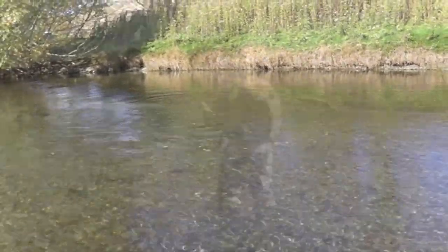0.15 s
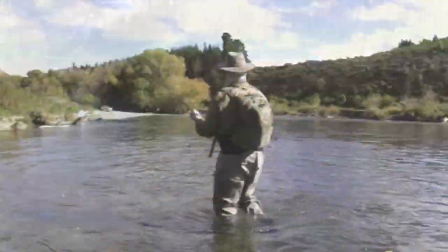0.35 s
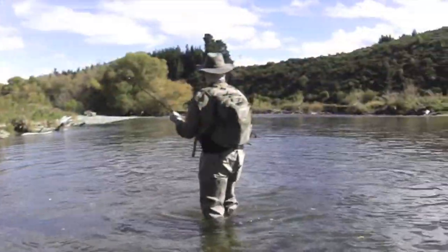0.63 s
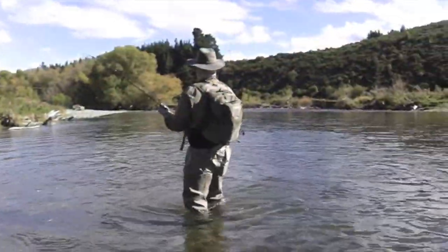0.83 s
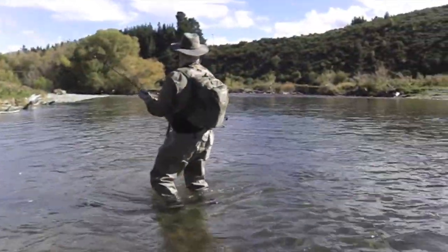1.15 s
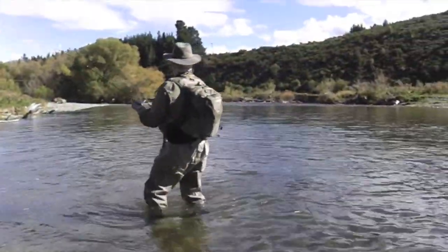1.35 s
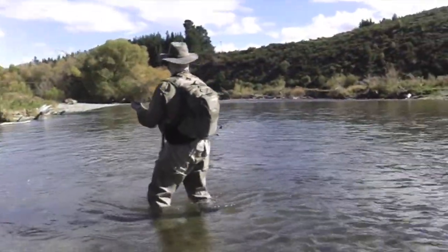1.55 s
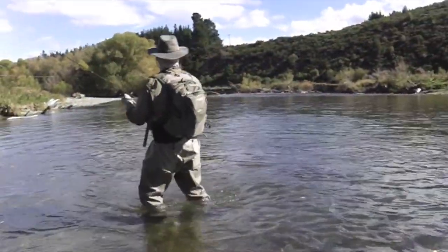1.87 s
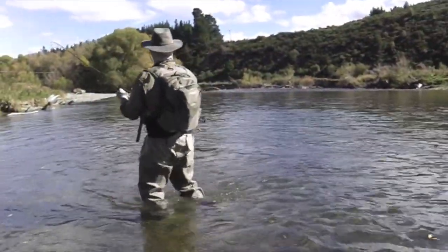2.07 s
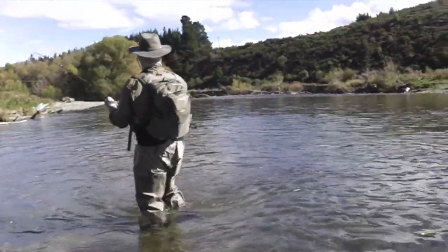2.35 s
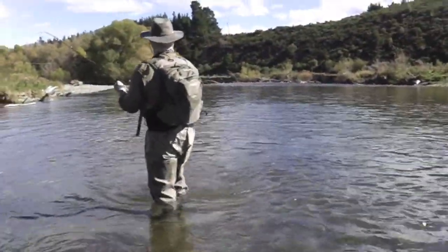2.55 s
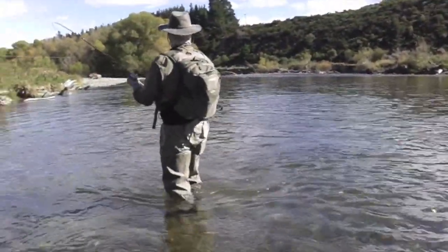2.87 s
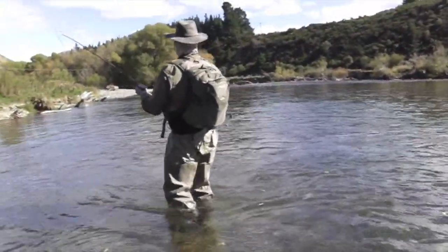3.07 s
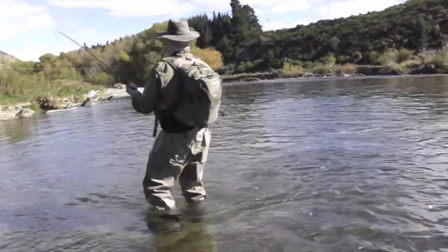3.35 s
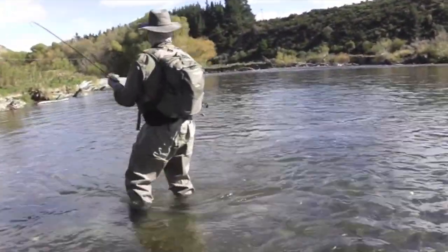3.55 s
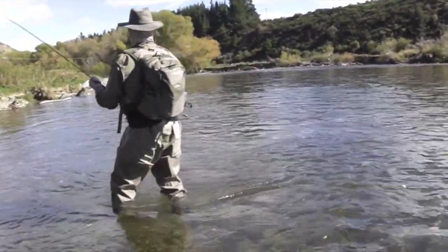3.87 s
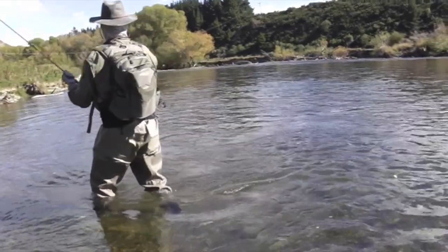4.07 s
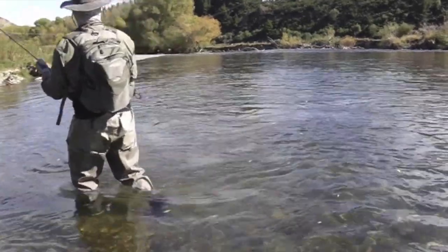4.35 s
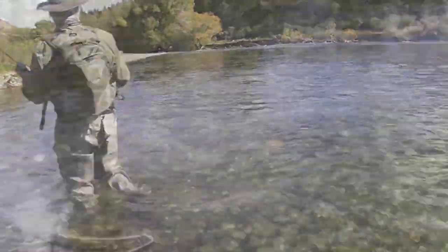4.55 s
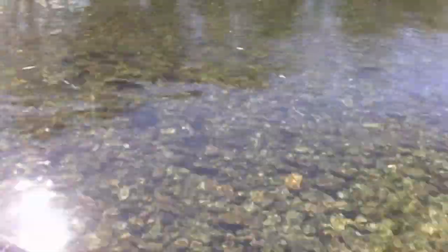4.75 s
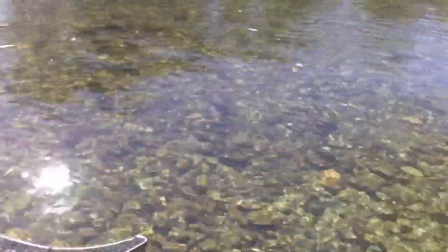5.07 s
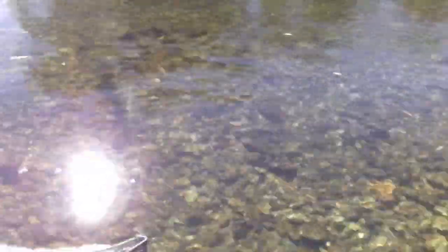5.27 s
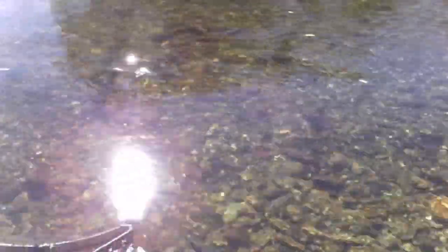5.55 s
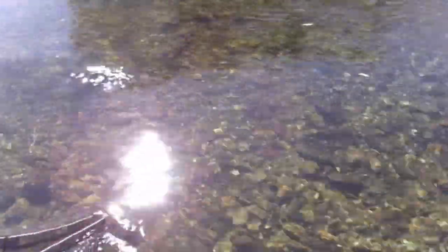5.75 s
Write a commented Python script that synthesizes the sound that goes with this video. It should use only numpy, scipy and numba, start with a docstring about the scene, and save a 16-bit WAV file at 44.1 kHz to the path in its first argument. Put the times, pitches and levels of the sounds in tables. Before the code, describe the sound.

Shallow river water rushes steadily over stones while someone wades, with gurgles, small splashes and drips, ending in loud close sloshing.

```python
"""A riffle rushes over distant stones as bubble-like noise; its tone and level shift within the first 0.6 s.
Faint insects, a narrow band of noise, swell at 0.6 s and fade. An angler wades on: gulps, splashes and swishes
are surges of ringing bubbles and noise, and single drips ring out as damped sines that rise in pitch.
Low, soft puffs of wind brush the two microphone ports from 0.6 s on.
From 5.2 s the stirring is at its strongest and the water sloshes right by the microphone."""
import sys
import numpy as np
from scipy import signal
from scipy.fft import rfft, irfft
from scipy.io import wavfile
from scipy.ndimage import uniform_filter1d
from numba import njit

SR = 44100
rng = np.random.default_rng(int(sys.argv[2]) if len(sys.argv) > 2 else 0)


def dump(signal):
    """Clip the signal to [-1, 1] and save it as 16-bit WAV at the path in sys.argv[1]."""
    limited = np.clip(np.atleast_2d(signal).T, -1, 1)
    pcm = np.round(limited * 32767).astype(np.int16)
    wavfile.write(sys.argv[1], SR, pcm)


N = 261072
TIME, BINS = np.arange(N) / SR, np.fft.rfftfreq(N, 1 / SR)  # [s], [Hz]

# how hard the water round the legs is stirred: (time [s], level above an easy walk [dB])
STIRRING = [(0, -9), (.3, -12), (.55, -3.5), (1.27, 1), (1.5, -4.5), (1.85, 1), (2.3, -3.5), (2.75, -5),
            (3.05, -0.5), (3.3, -8), (3.76, -10), (4.1, 0), (4.7, 5.5), (5.11, -1.5), (5.22, 12), (5.5, 11),
            (5.92, 7)]
# water closes over the hollow behind a leg:
# (time [s], gurgle level [dB], length scale [s], slosh relative to gurgle [dB])
GULPS = [(0.435, -43, 0.013, -5.5), (0.504, -44.5, 0.015, -2.5), (0.878, -46, 0.12, -20),
         (1.09, -38.5, 0.016, -1), (1.22, -50, .02, 1.5), (1.838, -45, 0.017, -19),
         (2.422, -43.5, 0.022, -9), (2.55, -43, 0.089, -24), (3.878, -38, .006, -18),
         (4.345, -44, 0.023, -10), (4.76, -57, 0.033, 9.5), (4.967, -40.5, 0.042, -7.5),
         (5.12, -34.5, 0.025, -27), (5.237, -35, 0.019, -11), (5.345, -35.5, .035, -12),
         (5.543, -41, 0.032, 2.5), (5.747, -40.5, 0.026, -9), (5.873, -33.5, 0.037, -14)]
# a leg breaks the surface, or thrown water falls back:
# (time [s], splash level [dB], length scale [s], spray relative to splash [dB])
SPLASHES = [(0.877, -49.5, 0.026, -5), (1.612, -44.5, 0.03, -5), (1.762, -42, 0.078, -8),
            (2.059, -40, 0.012, -29), (2.512, -45.5, 0.026, -21), (2.661, -42, 0.07, -9.5),
            (3.067, -48.5, 0.022, -13), (3.572, -45.5, 0.046, -10.5), (3.885, -41.5, 0.015, -14),
            (4.29, -46.5, 0.032, -4.5), (4.427, -42.5, 0.046, -2.5), (4.547, -42.5, .03, -4.5),
            (5.016, -36, 0.065, 1), (5.063, -33.5, 0.036, -14), (5.708, -34.5, 0.028, -26),
            (5.915, -45, 0.015, 10.5)]
# colour of each size of bubble, largest first: (frequency [Hz], relative density [dB per Hz])
SLOSH_COLOUR = [(60, -38), (110, 1.5), (160, -6.5), (220, -2.5), (330, -1), (450, -1.5), (700, -14)]
GURGLE_COLOUR = [(250, -61), (450, 2.5), (650, 4), (900, 2), (1250, 3.5), (1700, -4.5), (2600, -5.5)]
SPLASH_COLOUR = [(1000, -5.5), (1700, 0.5), (2200, 2), (3400, -1.5), (4300, -6), (5200, -5), (6300, -20),
                 (8500, -13.5)]
SPRAY_COLOUR = [(4000, 4.5), (6000, 4), (7500, -4.5), (8800, -4.5), (11000, -5), (16000, -8)]
# each size of bubble at an easy walk [dB], then its gain per dB of stirring [dB]
SLOSH_DB, GURGLE_DB, SPLASH_DB, SPRAY_DB = -57.5, -48, -48.5, -56.5
SLOSH_GROWTH, GURGLE_GROWTH, SPLASH_GROWTH, SPRAY_GROWTH = 0.84, 0.87, 0.87, 1.16
BODY_DB = -8  # gurgle that goes with a splash, relative to it [dB]
RISE_SHARE, FALL_SHARE = 0.88, 1.16  # build and decay of a surge, as shares of its length scale
# single bubbles and drips that stand out:
# (time [s], level before trim and attack [dB], starting pitch [Hz], ring to 1/e before a floor [cycles])
DRIPS = [(0.318, -25, 957, 1.2), (0.332, -24.5, 920, 1.7), (0.381, -29, 4900, 6.9),
         (0.926, -32.5, 2240, 11), (0.991, -24, 4350, 3), (1.057, -34, 245, 2.9), (1.074, -29, 284, 3.9),
         (1.103, -28, 710, 2.2), (1.111, -28, 1200, 3), (1.472, -23, 1380, 2.5), (1.615, -23.5, 2280, 6.5),
         (1.631, -13.5, 1900, 0.85), (1.731, -22.5, 1850, 4.5), (1.857, -24, 10820, 1.3),
         (1.887, -24.5, 1380, 4), (1.935, -26, 6320, 6.1), (2.003, -16.5, 7560, 0.59),
         (2.012, -23.5, 2550, 4.9), (2.024, -26, 3220, 5.8), (2.089, -27, 2340, 5.5),
         (2.171, -27, 4650, 6.5), (2.517, -15.5, 1244, 3.5), (2.534, -27, 390, 5.8),
         (2.635, -25.5, 3200, 10), (2.64, -16, 6460, 2.6), (2.643, -20.5, 5840, 4.5),
         (2.809, -33, 472, 4.8), (2.84, -20.5, 1190, 0.67), (2.918, -17, 8600, 0.63),
         (2.953, -27.5, 1030, 4.5), (2.958, -17.5, 1880, 3.1), (2.958, -19, 2920, 4.3),
         (3.041, -25, 3100, 3), (3.779, -28.5, 1404, 9.6), (3.873, -13, 2180, 0.7), (3.879, -26, 1570, 4.5),
         (3.911, -16.5, 5750, 5), (4.028, -15, 1020, 0.6), (4.097, -24.5, 225, 0.6),
         (4.197, -26.5, 1256, 6.8), (4.203, -23.5, 2180, 4.5), (4.286, -12, 11300, 0.66),
         (4.343, -30, 1420, 14), (4.48, -12.5, 1000, 0.48), (4.546, -15.5, 5100, 2),
         (4.844, -14.5, 1250, 0.65), (5.01, -14.5, 5200, 3.9), (5.041, -14, 9030, 0.8),
         (5.113, -12.5, 2900, 3.2), (5.146, -23, 2530, 10), (5.16, -18.5, 408, 5.6), (5.17, -24, 478, 5.7),
         (5.233, -21, 320, 1.5), (5.267, -12.5, 13700, 5.8), (5.272, -19, 1110, 3.6),
         (5.436, -16.5, 563, 1.1), (5.535, -21.5, 660, 4.7), (5.685, -13.5, 9260, 3.3),
         (5.7, -14.5, 4930, 4.9), (5.712, -19.5, 1360, 3.4), (5.795, -8, 5270, 0.74),
         (5.833, -21, 4870, 7.9), (5.894, -6, 7900, 0.72)]
# hissing strokes through the surface: (time [s], level [dB], length scale [s])
SWISHES = [(0.518, -35.5, 0.032), (2.83, -44.5, 0.027), (4.12, -45.5, 0.045)]
# colour of those strokes: (frequency [Hz], relative density [dB per Hz])
SWISH_COLOUR = [(300, -40), (900, 0), (1300, -6), (1750, -9), (2300, 0.5), (2600, -1.5), (2950, -1.5),
                (3300, -34), (3600, -3), (4500, -36)]
# colour of the riffle at first, then for the rest: (frequency [Hz], relative density [dB per Hz])
EARLY_RIFFLE = [(25, -30), (70, -20), (130, -21), (280, -12), (400, -6), (520, 1), (680, -1), (900, -1.5),
                (1300, -0.5), (2200, -13.5), (4300, -19), (6800, -25), (8700, -25), (15000, -31)]
LATER_RIFFLE = [(25, -22), (80, -30), (180, -13), (300, -10), (500, -0.5), (680, 1), (900, -3), (1250, 1),
                (1750, -7), (3500, -14), (5200, -19), (7000, -23.5), (11000, -25.5), (16000, -29)]
EARLY_RIFFLE_DB, LATER_RIFFLE_DB = -48.5, -44
FADE_START_S, FADE_END_S = 0.28, 0.56  # one colour of riffle blends into the other
# puffs of wind on the ports: (time [s], level [dB], length scale [s])
PUFFS = [(0.647, -56, 0.016), (0.774, -52, 0.026), (1.14, -57, 0.021), (1.308, -56, 0.028),
         (1.686, -56, 0.033), (2.4, -58, 0.028), (2.896, -51.5, 0.023), (3.014, -47, 0.032),
         (3.23, -55, 0.15), (3.81, -50, 0.022), (4.017, -49, 0.032), (4.428, -54, 0.028),
         (4.57, -57, 0.027), (5.57, -49, 0.019)]
# colour of the wind: (frequency [Hz], relative density [dB per Hz])
WIND_COLOUR = [(20, -42), (45, -20), (75, -7.5), (110, -12), (180, -27), (400, -24)]
BREEZE_DB = -63.5  # the steady breeze under the puffs
# faint buzz on the bank: (time [s], level [dB])
INSECTS = [(0, -71), (.35, -72), (.6, -66), (1.1, -70), (2, -79), (5.92, -89)]
# colour of that buzz: (frequency [Hz], relative density [dB per Hz])
INSECT_COLOUR = [(7000, -35), (8300, -10), (8700, -1), (8950, -24), (9400, -22), (11000, -40)]
# how alike left and right are in the noise: (frequency [Hz], likeness [0 to 1])
LIKENESS = [(40, 0.66), (90, 0.26), (250, 0.9), (1500, .99), (2600, 0.94), (4400, 0.87), (6500, 0.99),
            (8500, 0.2), (15000, 0.8)]
# level between the ports: (frequency [Hz], left minus right [dB])
BALANCE_LR = [(50, 7), (90, -2.5), (180, 3), (500, 2), (1200, 1.5), (2300, 0.4), (3000, 1.5), (4700, 2.2),
              (5600, 1.4), (7500, -2.5), (9000, -3), (12000, -1), (15000, -0.5)]
# phase between the ports: (frequency [Hz], lead of the left [radians])
PHASE_LR = [(3800, 0.075), (4600, -0.62), (6600, -0.96), (7600, -1), (8600, -0.43), (10300, -0.054),
            (12000, 0.31), (14500, 0.54)]
EDGE_HZ = 15950  # upper band limit


def wading():
    """Four sizes of bubble follow the stirring; gulps add large ones, splashes mostly small ones."""
    pockets = cloud(147.9, 541, spread_db=1.0, cycles=2.77, count=700)
    large = cloud(398.7, 1874, spread_db=3.5, cycles=3.5, count=3000)
    small = cloud(1496, 6320, spread_db=3.0, cycles=5.75, count=4500)
    droplets = cloud(5140, 14500, spread_db=3.0, cycles=1.5, count=2500)

    gulps = sum(surge(s, db, length) for s, db, length, _ in GULPS)
    deep_gulps = sum(surge(s, db + deep, length) for s, db, length, deep in GULPS)
    splashes = sum(surge(s, db, length) for s, db, length, _ in SPLASHES)
    fine_splashes = sum(surge(s, db + fine, length) for s, db, length, fine in SPLASHES)

    # powers add: the steady stirring plus the surges
    stir = level(STIRRING)
    slosh_power = (amp(SLOSH_DB) * stir ** SLOSH_GROWTH) ** 2 + deep_gulps
    gurgle_power = (amp(GURGLE_DB) * stir ** GURGLE_GROWTH) ** 2 + gulps + amp(BODY_DB) ** 2 * splashes
    splash_power = (amp(SPLASH_DB) * stir ** SPLASH_GROWTH) ** 2 + splashes
    spray_power = (amp(SPRAY_DB) * stir ** SPRAY_GROWTH) ** 2 + fine_splashes

    slosh = water(SLOSH_COLOUR, pockets, np.sqrt(slosh_power), merge_db=-45, patchy_db=-3.0, flicker_db=2.0)
    gurgle = water(GURGLE_COLOUR, large, np.sqrt(gurgle_power), merge_db=-29.0, patchy_db=3.0, flicker_db=-0.5)
    splash = water(SPLASH_COLOUR, small, np.sqrt(splash_power), merge_db=-36, patchy_db=3.6, flicker_db=2.5)
    spray = water(SPRAY_COLOUR, droplets, np.sqrt(spray_power), merge_db=-50, patchy_db=6.0, flicker_db=5.0)
    return slosh + gurgle + splash + spray


def drips(rise=0.01, attack_cycles=0.32, lag_us=10, trim_db=-1,
          fragment_db=-12, fragment_s=0.0044, scatter_octaves=0.37, count=5):
    """Prominent single bubbles; each breaks off a few fainter ones in the next milliseconds."""
    s, db, hz, cycles = np.array(DRIPS, float).T[:, :, None]
    late, detune, side = rng.random((len(s), 3, count + 1)).transpose(1, 0, 2)
    child = np.arange(count + 1) > 0  # the first of each group is the parent
    start = s - child * fragment_s * np.log(1 - .95 * late)
    size = amp(db + trim_db + child * fragment_db)
    # most fragments are smaller: higher in pitch
    pitch = np.minimum(hz * 2 ** (child * scatter_octaves * (3 * detune - 1)), SR * .4)
    # a parent rings for at least 0.7 cycles; a fragment for half its parent's count plus half a cycle
    life = np.maximum(cycles, .7) * np.where(child, .5, 1) + child * .5
    # each lies a little to the left or to the right of the ports
    lag_s = lag_us * 1e-6 * np.sign(side - .5)
    glide = np.full(start.size, rise)  # the pitch climbs as a bubble nears the surface
    return ring(start.ravel(), size.ravel(), pitch.ravel(), life.ravel(), glide, lag_s.ravel(),
                max(attack_cycles, .01))


def swish():
    """Quick strokes through the surface: coloured noise that surges and dies."""
    power = sum(surge(*row) for row in SWISHES)
    return np.sqrt(power) * wash(SWISH_COLOUR, patchy_db=1.5, flicker_db=1)


def riffle():
    """The rush over distant stones: two colours of noise blended at equal power."""
    blend = np.clip((TIME - FADE_START_S) / (FADE_END_S - FADE_START_S), 0, 1)
    early = amp(EARLY_RIFFLE_DB) * wash(EARLY_RIFFLE, patchy_db=3.5, flicker_db=0.0)
    later = amp(LATER_RIFFLE_DB) * wash(LATER_RIFFLE, patchy_db=2.4, flicker_db=-0.06)
    return np.sqrt(1 - blend) * early + np.sqrt(blend) * later


def wind():
    """A light breeze of low noise with soft, short puffs at the ports."""
    puffs = sum(amp(db) ** 2 * np.exp(-((TIME - s) / length) ** 2) for s, db, length in PUFFS)
    power = amp(BREEZE_DB) ** 2 + puffs
    return np.sqrt(power) * wash(WIND_COLOUR, patchy_db=2.5, flicker_db=-0.5)


def insects():
    """A thin, far buzz: noise in one narrow treble band."""
    return level(INSECTS) * wash(INSECT_COLOUR, patchy_db=0, flicker_db=0.5)


def water(colour, bubbles, stir, merge_db, patchy_db, flicker_db):
    """Gently stirred water gives separate bubbles; above merge_db they crowd into a wash."""
    share = 1 / (1 + stir / amp(merge_db))
    separate = np.sqrt(share) * coloured(bubbles, colour)
    merged = np.sqrt(1 - share) * wash(colour, patchy_db, flicker_db)
    return stir * (separate + merged)


def surge(s, db, length):
    """Power of one push of water: it builds up to time s, then dies away."""
    t = (TIME - s) / length
    t = t / np.where(t < 0, RISE_SHARE, FALL_SHARE)
    return amp(db) ** 2 / np.cosh(np.clip(t, -20, 20)) ** 2


def cloud(low_hz, high_hz, spread_db, cycles, count, rise=0.037, lag_us=11):
    """Bubbles at random moments and pitches: most are faint, a few are large."""
    when, pitch, big, damping, glide, side = rng.random((count, 6)).T
    hz = np.minimum(low_hz * (high_hz / low_hz) ** pitch, SR * .4)
    size = amp(spread_db * np.minimum(-np.log(1 - big), 4)) * hz / low_hz
    life = cycles * 2 ** (2 * damping - 1)
    lag_s = lag_us * 1e-6 * np.sqrt(3) * (2 * side - 1)  # lag_us is the rms lag
    return ring(when * N / SR, size, hz, life, 2 * rise * glide, lag_s, 0.74)


@njit
def ring(start, size, hz, cycles, rise, lag, attack_cycles):
    """Sums bubbles: damped sines that rise in pitch and reach the two ports a moment apart."""
    out = np.zeros((2, N))
    for k in range(len(start)):
        first, life = int(start[k] * SR), cycles[k] / hz[k] * SR  # [samples]
        step = 2 * np.pi * hz[k] / SR
        turn = np.exp(1j * step - 1 / life)
        bend = np.exp(1j * step * rise[k] / life)  # pitch gains the share "rise" in each 1/e life
        port = np.exp(1j * np.pi * hz[k] * lag[k])  # half the lag, as a phase, for each port
        swing, closed, opening = size[k] + 0j, 1.0, np.exp(-hz[k] / SR / attack_cycles)
        for i in range(max(first, 0), min(first + int(5 * life), N)):
            out[0, i] += (1 - closed) * (swing * port).imag
            out[1, i] += (1 - closed) * (swing / port).imag
            swing *= turn
            turn *= bend
            closed *= opening
    return out


def wash(colour, patchy_db, flicker_db):
    """Countless tiny bubbles merged into noise, with drifting patches and a quick shared flicker."""
    hz = np.fft.rfftfreq(512, 1 / SR)
    a, b, c, d, patches = rng.standard_normal((5, N // 128 + 5, len(hz)))
    # smooth the patches over time and frequency, the flicker over time alone
    patches = uniform_filter1d(uniform_filter1d(patches, size=10, axis=0), size=6, axis=1)
    flicker = evened(uniform_filter1d(rng.standard_normal(len(a)), size=7))[:, None]
    alike = np.clip(read(LIKENESS, hz), 0, 1)
    left = a + 1j * b
    right = alike * left + np.sqrt(1 - alike ** 2) * (c + 1j * d)
    frames = np.array([left, right]) * amp(patchy_db * evened(patches) + flicker_db * flicker)
    noise = signal.istft(frames, nperseg=512, noverlap=384, time_axis=1, freq_axis=2)[1][:, :N]
    return coloured(noise, colour)


def coloured(x, colour):
    """Filters by a spectrum that falls away steeply beyond its ends; rms 1."""
    low_skirt = 1 + (colour[0][0] / (BINS + 1) / 2) ** 4
    high_skirt = 1 + (BINS / colour[-1][0] / 2) ** 4
    skirts = 1 / np.sqrt(low_skirt * high_skirt)
    return evened(irfft(rfft(x) * skirts * amp(read(colour, BINS)), N))


def level(rows):
    """A (time, dB) curve as a gain for every sample."""
    s, db = np.transpose(rows)
    return amp(np.interp(TIME, s, db))


def read(points, hz):
    """Reads a spectrum on a log-frequency axis."""
    f, value = np.transpose(points)
    return np.interp(np.log(hz + 1), np.log(f + 1), value)


def evened(x):
    """Scales to rms 1."""
    return x / np.sqrt(np.mean(x ** 2) + 1e-20)


def amp(db):
    """Decibels to gain."""
    return 10 ** (np.asarray(db) / 20)


def scene():
    """Open air: the sources add up with no room."""
    return wading() + drips() + swish() + riffle() + wind() + insects()


def record(dry):
    """The two ports resonate a little differently, in level and in phase; then the band limit."""
    half = amp(read(BALANCE_LR, BINS) / 2) * np.exp(.5j * read(PHASE_LR, BINS))  # half to each port
    ports = irfft(rfft(dry) * np.array([half, 1 / half]), N)
    lowpass = signal.firwin(511, EDGE_HZ, window=("kaiser", 9), fs=SR)
    return signal.oaconvolve(ports, lowpass[None], "same")


dry = scene()
out = record(dry)
dump(out)
```